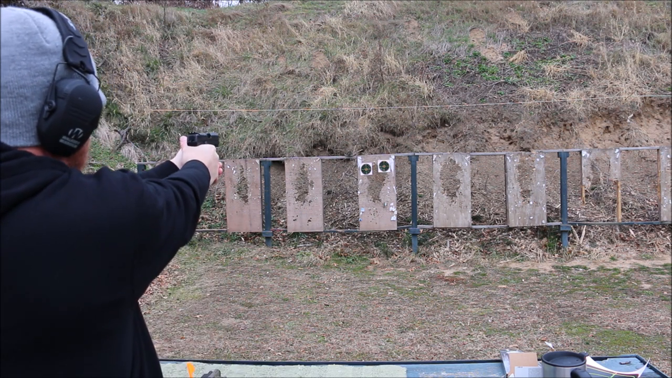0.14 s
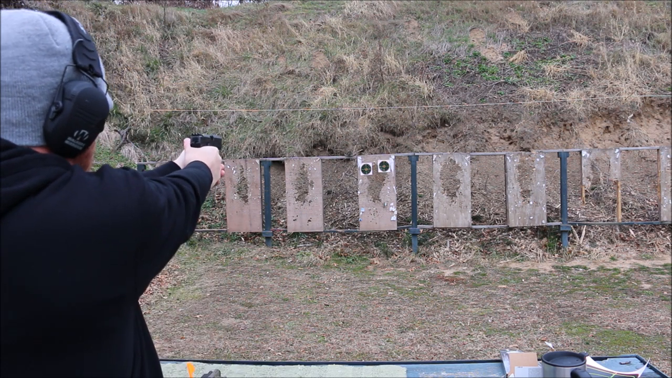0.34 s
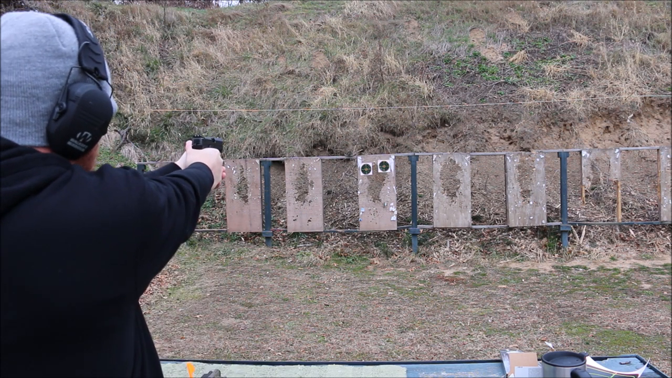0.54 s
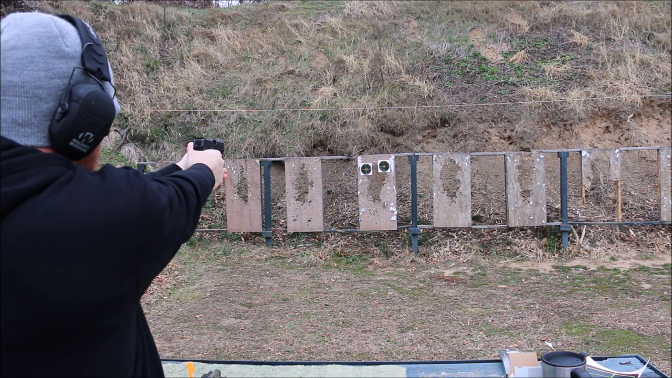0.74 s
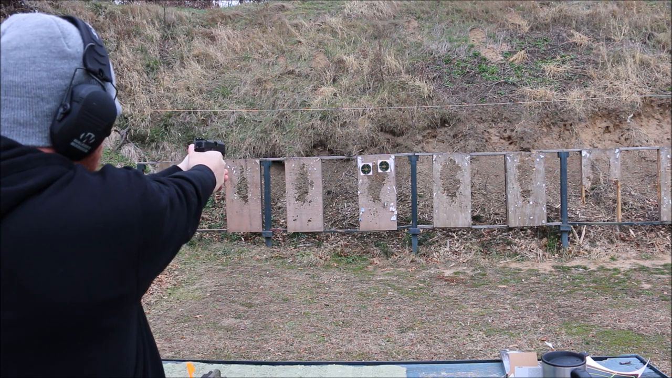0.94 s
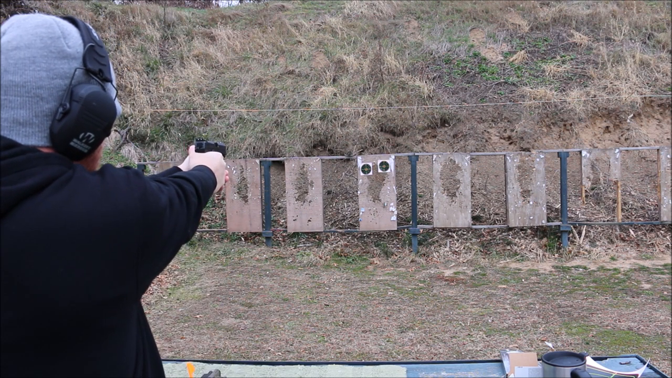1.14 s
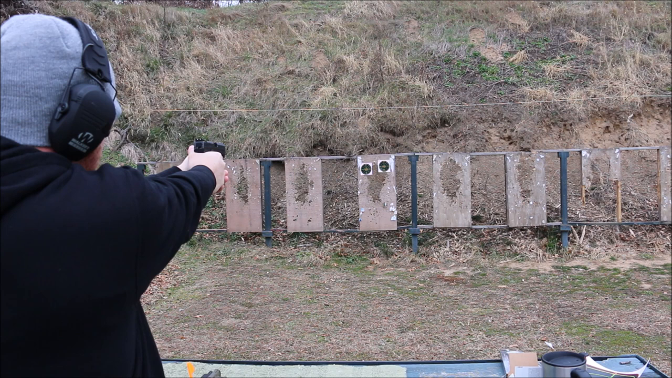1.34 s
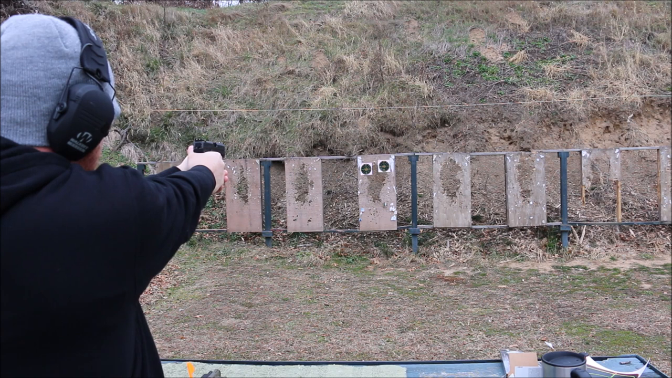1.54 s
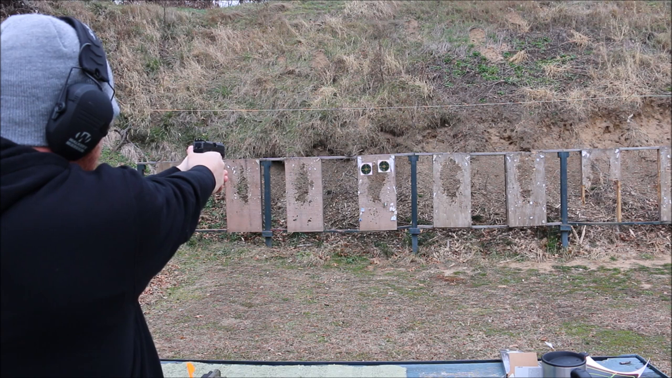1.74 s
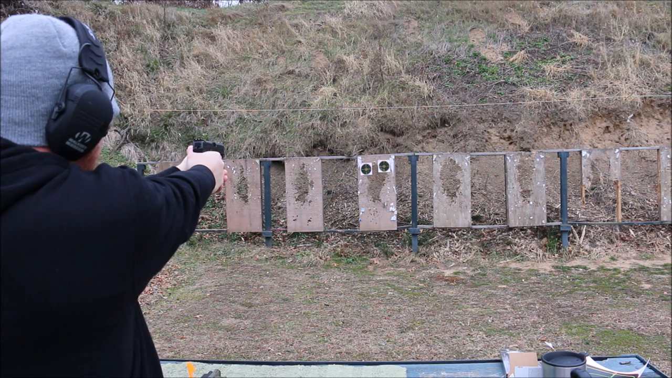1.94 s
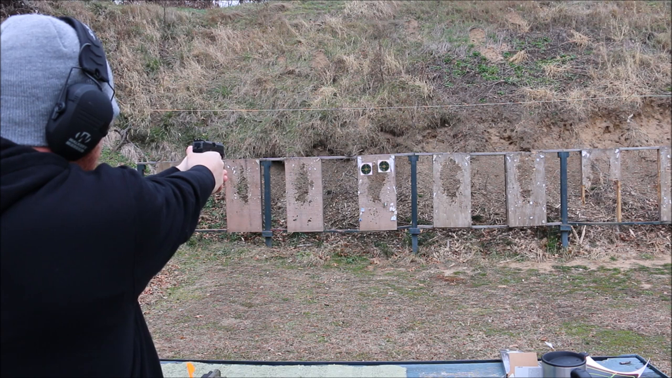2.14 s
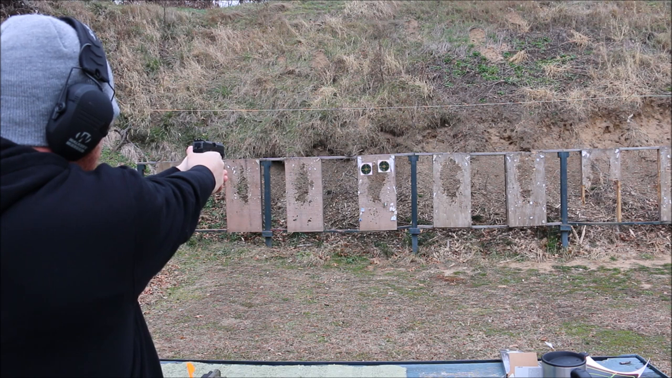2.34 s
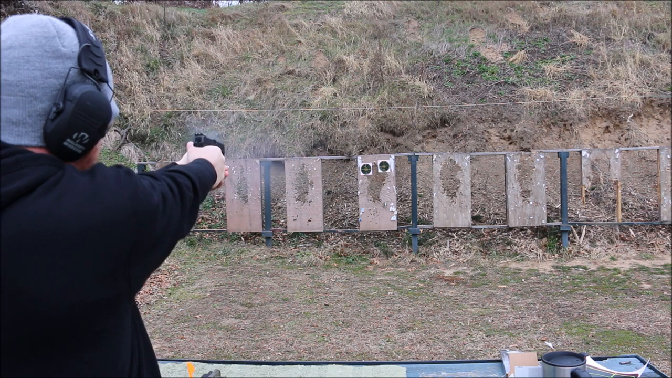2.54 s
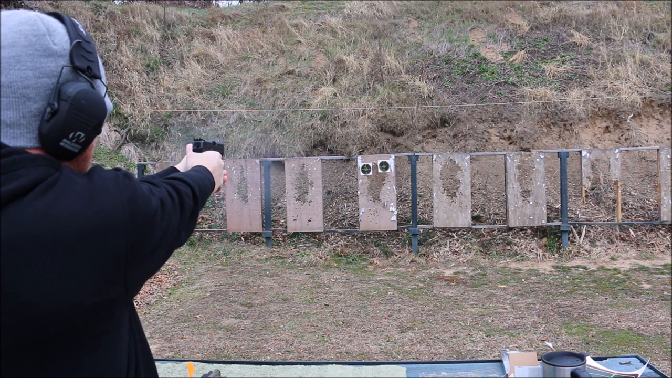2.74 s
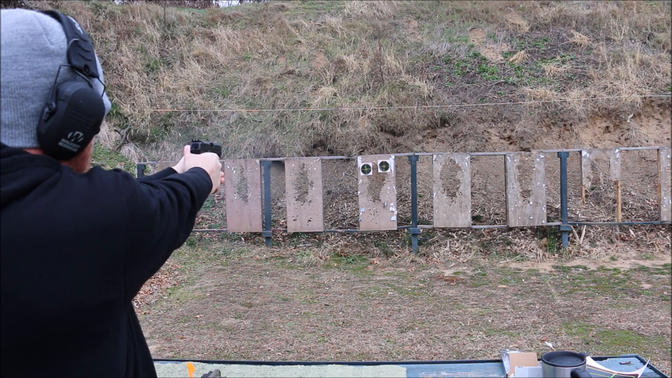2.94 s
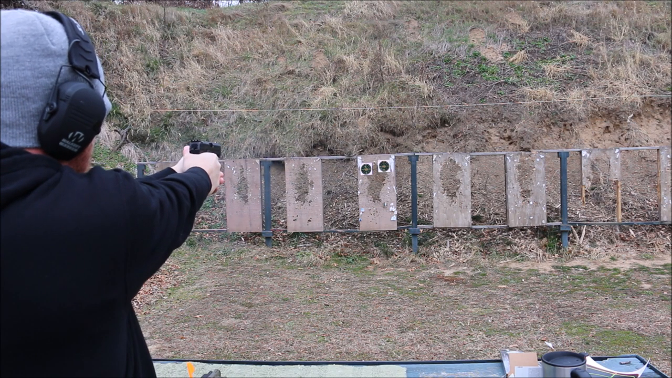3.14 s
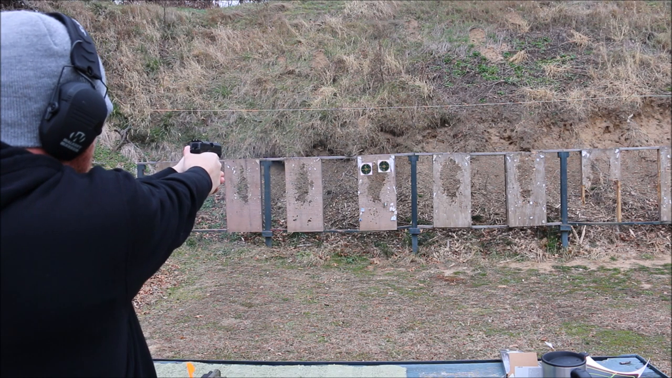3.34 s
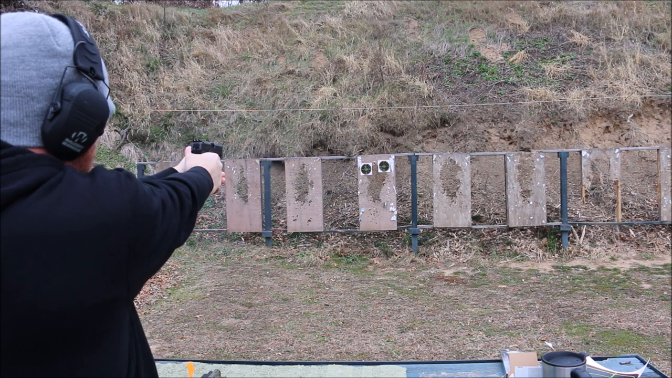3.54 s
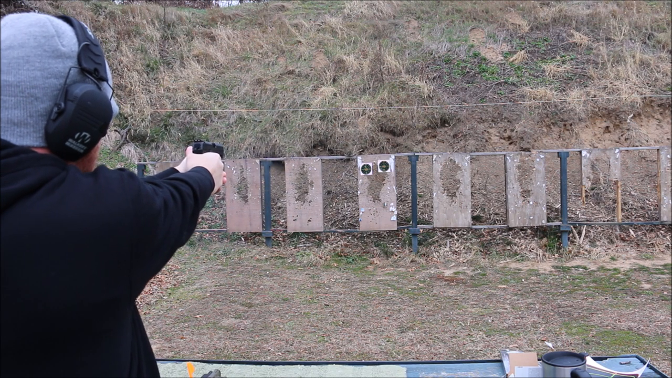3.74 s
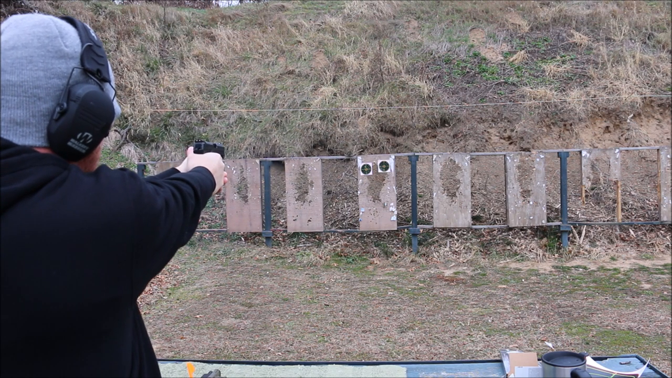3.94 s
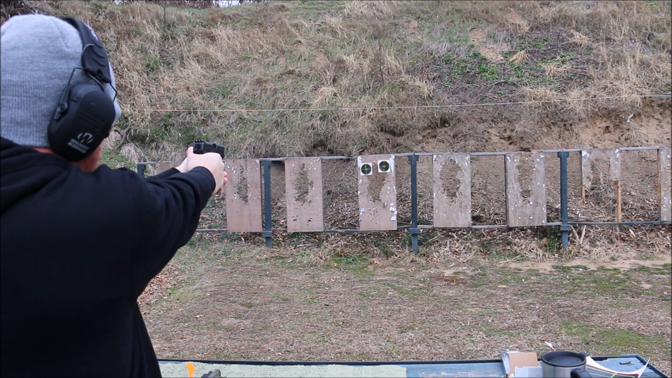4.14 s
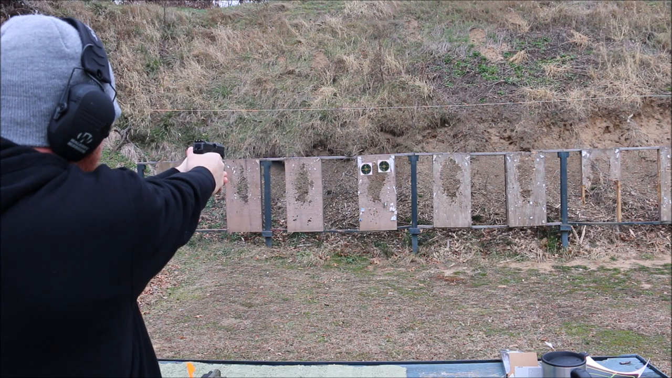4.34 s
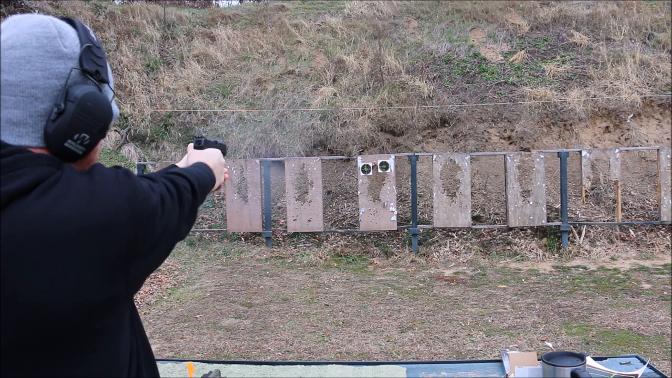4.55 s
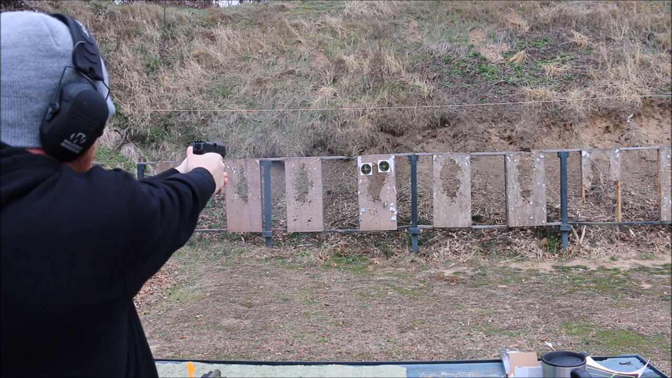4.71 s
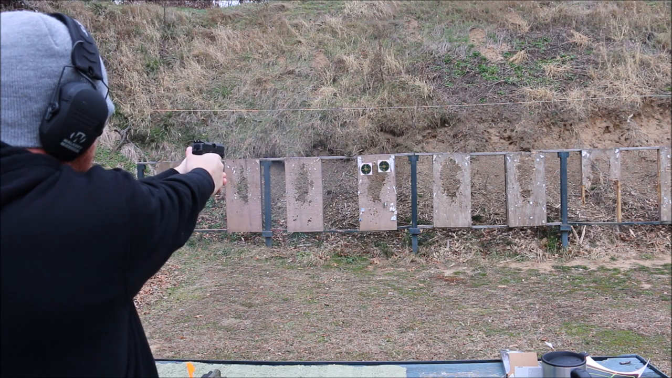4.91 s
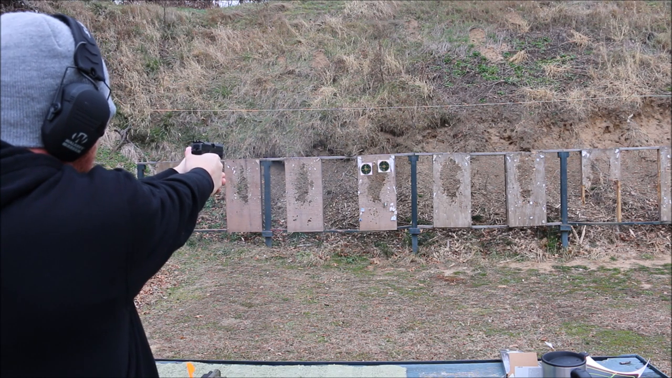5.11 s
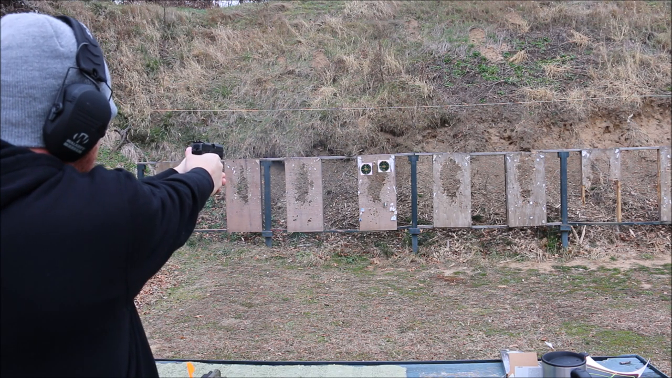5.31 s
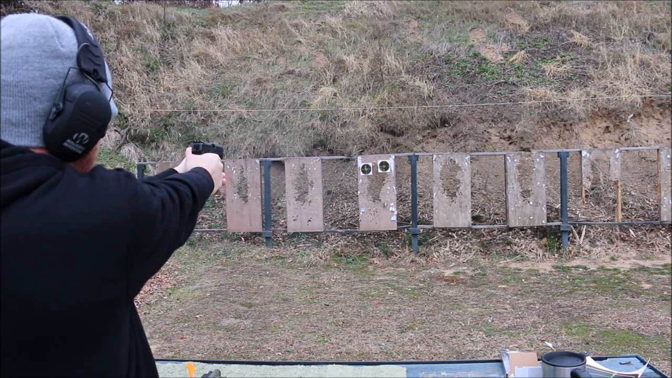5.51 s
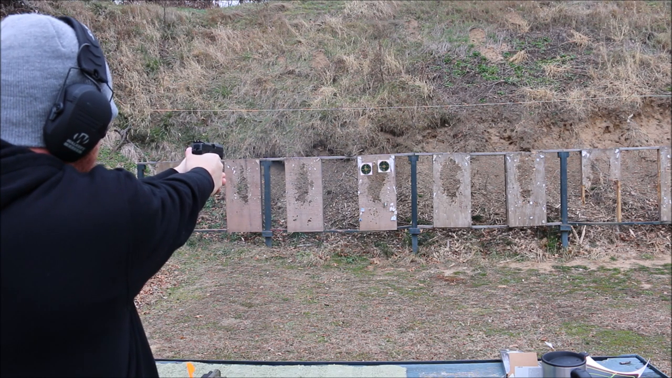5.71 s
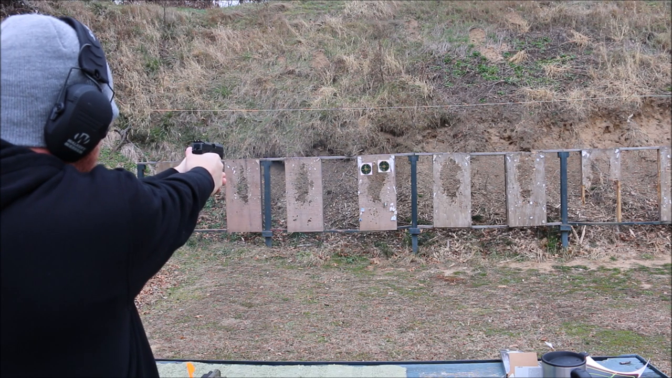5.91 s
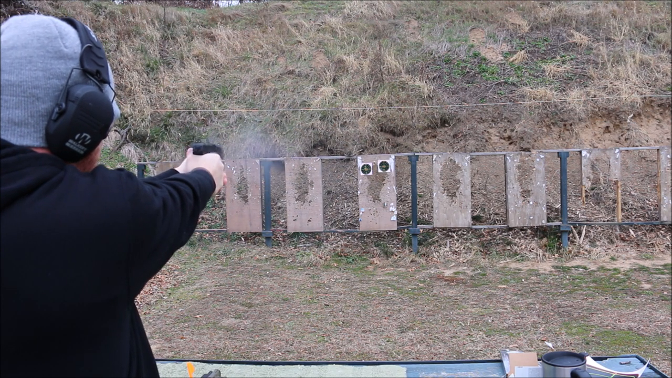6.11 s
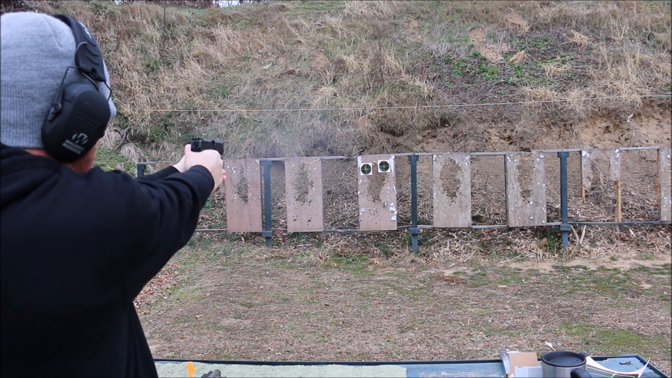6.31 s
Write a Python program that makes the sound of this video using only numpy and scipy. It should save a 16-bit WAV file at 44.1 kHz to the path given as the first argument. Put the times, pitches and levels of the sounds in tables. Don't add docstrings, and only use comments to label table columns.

```python
import sys
import numpy as np
from scipy import signal
from scipy.fft import rfft, irfft, next_fast_len
from scipy.io import wavfile
from scipy.ndimage import uniform_filter1d, map_coordinates

SR = 44100
rng = np.random.default_rng(int(sys.argv[2]) if len(sys.argv) > 2 else 0)


def waveform_to_disk(signal):
    frames = np.transpose(np.atleast_2d(signal))
    scaled = np.clip(frames, -1, 1) * 32767
    samples = np.round(scaled).astype(np.int16)
    wavfile.write(sys.argv[1], SR, samples)


def volts(x):
    e = np.asarray(x, float) / 20
    return 10 ** e


N = 280917


def unit(x):
    return x / np.sqrt(np.mean(x ** 2) + 1e-20)


def along(points, hz):
    f, value = np.transpose(points)
    return np.interp(np.log(hz + 1), np.log(f + 1), value)


def filtered(x, response):
    size = next_fast_len(x.shape[-1] + 8192)
    spectrum = rfft(x, size) * response(np.fft.rfftfreq(size, 1 / SR))
    return irfft(spectrum, size)[..., :x.shape[-1]]


def peak(f, hz, width):
    return 1j * f * width / (hz * hz - f * f + 1j * f * width)


def low_cut(f, hz):
    return 1j * f / (hz + 1j * f)


def fade(db, t, t60):
    return volts(db - 60 * t / t60)


def rise(t, attack):
    return 1 - np.exp(-t / attack)


def tone(pitch_hz):
    return np.sin(2 * np.pi * np.cumsum(pitch_hz) / SR)


def add(track, s, sound):
    part = track[round(s * SR):][:len(sound)]
    part += sound[:len(part)]


def burst(hz, width, db, t60, attack):
    t = np.arange(SR // 5) / SR
    noise = unit(filtered(rng.standard_normal(len(t)), lambda f: peak(f, hz, width) ** 2))
    return fade(db, t, t60) * rise(t, attack) * noise


# f/Hz, level/dB (per Hz)
AIR_COLOUR = [(12, -40.5), (25, -4), (100, -3), (200, -2.5), (320, -9), (750, -12), (2000, -21.5),
              (6000, -50)]
# t/s, level/dB
SLEEVE = [
    (.262, -61),
    (.3, -60),
    (.41, -65),
    (.455, -65),
]


def quiet():
    t = np.arange(N) / SR
    drift_db = 0.7 * map_coordinates(rng.standard_normal(60), [t * 8])
    air = unit(filtered(rng.standard_normal(N), lambda f: volts(along(AIR_COLOUR, f))))
    cloth = unit(filtered(rng.standard_normal(N), lambda f: peak(f, 2200, 1800) ** 2))
    half_length_s = 0.016
    strokes = sum(volts(db) * np.exp(-((t - s) / half_length_s) ** 2) for s, db in SLEEVE)
    return volts(-62.5 + drift_db) * air + strokes * cloth


# f/Hz, width/Hz, level/dB
WOOD_SPOTS = [
    [(1182, 570, 4), (2130, 120, 6.5), (2927, 390, 9.5), (3960, 820, -26), (9000, 13000, -28)],
    [(1410, 270, -6.5), (2712, 330, 0), (3700, 280, 4), (5210, 980, -2.5), (12500, 3500, -7.5)],
    [(1490, 900, -12), (2800, 460, 2.5), (4200, 320, 5.5), (6000, 1500, -1), (11200, 1500, -1)],
]


def wood_knock(db, rattle_db, spot):
    t = np.arange(4000) / SR
    push = np.exp(-((t - 0.0003) / 0.00007) ** 2)
    rim_edge = 0.23 * np.exp(-((t - 0.0003) / 0.00002) ** 2)
    rattle = fade(rattle_db - db, t, 0.044) * rng.standard_normal(len(t))
    blow = push + rim_edge + filtered(rattle, lambda f: 1 / (1 + 1j * f / 4500) ** 4)

    def bench(f):
        return sum((-1) ** k * volts(g) * peak(f, hz, width) for k, (hz, width, g) in enumerate(WOOD_SPOTS[spot]))

    wood = filtered(blow, bench)
    return volts(db) * wood / abs(wood).max()


def ground_snap(db, hz):
    t = np.arange(SR // 2) / SR
    snap = np.sin(2 * np.pi * hz * t) * np.exp(-1.6 * hz * t) * rise(t, 0.0001)
    return volts(db + 10.5) * filtered(snap, lambda f: low_cut(f, 150) / (1 + 1j * f / (1.34 * hz)) ** 3)


def ground_thud(db):
    t = np.arange(SR // 2) / SR
    return -fade(db, t, 0.013) * np.sin(2 * np.pi * 360 * t) * rise(t, 0.00068)


# f/Hz, level/dB, t60/s
CASE_RING = [(10885, -33, .27), (10930, -37, 0.38), (11050, -44, .15), (5225, -42.5, 0.26),
             (5400, -45.5, 0.3)]


def case_ring():
    t = np.arange(SR // 2) / SR
    spin = 1 + 0.7 * np.cos(2 * np.pi * 13 * (t - 0.012))
    return spin * sum(fade(db, t, t60) * np.sin(2 * np.pi * hz * t) for hz, db, t60 in CASE_RING)


# t/s, blow level/dB, rattle level/dB, spot number
BENCH_KNOCKS = [
    (3.027, 8, -9, 0),
    (3.8255, -29, -40, 2),
    (5.0667, -4.5, -29, 0),
    (5.0671, 6.5, -3, 1),
    (5.116, -22, -36, 2),
]
# t/s, snap level/dB, snap f/Hz, thud level/dB
GROUND_TAPS = [
    (3.6246, -25.5, 3130, -22.5),
    (3.627, -24.5, 1190, -30),
    (3.8044, -35, 2800, -66),
    (5.363, -30, 6000, -70),
    (5.755, -38, 4000, -69),
    (5.7987, -16.5, 1200, -23),
    (5.799, -12.5, 2920, -60.5),
    (5.8022, -22, 2580, -28.5),
    (5.8165, -42, 3500, -68),
    (6.026, -33.5, 2950, -71),
]
# t/s, snap level/dB
SETTLING = [
    (3.363, -45),
    (3.443, -48),
    (3.509, -47),
    (5.69, -46),
]


def brass():
    out = np.zeros(N)
    for s, db, rattle_db, spot in BENCH_KNOCKS:
        add(out, s, wood_knock(db, rattle_db, spot))
    for s, db, hz, thud_db in GROUND_TAPS:
        add(out, s, ground_snap(db, hz))
        add(out, s, ground_thud(thud_db))
    for s, db in SETTLING:
        add(out, s, ground_snap(db, hz=7000))
    add(out, BENCH_KNOCKS[3][0] + 0.00011, case_ring())
    return out


def trunks(count):
    size_db = 1.2 * unit(uniform_filter1d(rng.standard_normal(count), size=60))
    return unit(volts(size_db) * rng.standard_normal(count))


# delay t/s, level/dB
ROLL_FADE = [(0, -14.5), (0.056, -10.5), (0.111, -24.5), (.23, -21.5), (.43, -22.5), (0.579, -31.5),
             (1.1, -47.5), (1.55, -49.5), (2.1, -63)]
# f/Hz, level/dB (per Hz)
WOODS_COLOUR = [(100, -45), (300, -4.5), (950, 0), (1500, -8.5), (2400, -9), (4200, -18.5), (8000, -39),
                (15700, -66.5)]
# delay t/s, peak level/dB, f/Hz
BANKS = [(.0868, -8, 1007), (.0995, -7, 1141), (.1128, -11, 1050), (.1675, -13.5, 630), (.1965, -14.5, 637),
         (.2135, -14, 800), (.2675, -15, 690), (.2945, -12, 510), (.3455, -17.5, 980), (.3685, -12.5, 910),
         (.4105, -23.5, 746), (.4415, -12.5, 770), (.5625, -30.5, 960), (.7305, -31.5, 620),
         (.94, -37, 810), (1.0575, -44.5, 1030)]


def roll():
    s, db = np.transpose(ROLL_FADE)
    hz, t, grid = signal.stft(trunks(int(s[-1] * SR)), SR, nperseg=256)
    uneven = uniform_filter1d(rng.standard_normal(grid.shape), size=5, axis=0)
    uneven_db = 1.8 * unit(uniform_filter1d(uneven, size=4, axis=1))
    colour = volts(along(WOODS_COLOUR, hz))
    colour = colour / np.sqrt(np.mean(colour ** 2))

    nearest_s, tree_line_s = 0.16, 0.37
    lift_db = np.zeros(len(t))
    for at, bank_db, _ in BANKS:
        if at > nearest_s:
            trees_db = 0.3 + 0.47 * (bank_db - np.interp(at, s, db))
            lift_db += trees_db * np.exp(-((t - at) / (0.027 * at)) ** 2)
    solid = np.clip(1.2 - hz / 6000, 0.3, 1)[:, None]
    air_db_per_s = 2.5 + 1 * (hz[:, None] / 1000) ** 1.746
    air_db = air_db_per_s * (np.maximum(t, nearest_s) - tree_line_s)
    gain = volts(np.interp(t, s, db) + solid * lift_db - air_db + uneven_db)
    out = signal.istft(grid * colour[:, None] * gain, SR, nperseg=256)[1]
    return filtered(out, lambda f: low_cut(f, 130) ** 3)


def crack():
    t = np.arange(SR // 50) / SR
    pitch_hz = (2100 + 1500 * np.exp(-t / 0.0008)) * rng.uniform(0.93, 0.94)
    cycles = fade(-0.5, t, 0.018) * rise(t, 0.00028) * tone(pitch_hz)
    return cycles + burst(hz=4500, width=9000, db=-11.5, t60=0.014, attack=0.00027)[:len(t)]


def blast():
    t = np.arange(SR // 5) / SR
    sweep = fade(15, t, 0.044) * tone(560 + 4200 * np.exp(-t / 0.0018))
    swing = -fade(9.5, t, 0.028) * np.sin(2 * np.pi * 70 * t)
    boom = burst(hz=183, width=70, db=-1.5, t60=0.09, attack=0.0039)
    body = burst(hz=671, width=560, db=20.5, t60=0.044, attack=0.0016)
    gap = fade(11, t, 0.057) * rise(t, 0.0016) * np.sin(2 * np.pi * 440 * t)
    return sweep + swing + boom + gap + body


# delay t/s, level/dB, dulling f/Hz, t60/s
WALLS = [
    (0.0454, -9, 10950, .3),
    (0.0866, -22.5, 3830, 0.043),
    (0.091, -24.5, 2480, 0.049),
]


def hollow():
    out, direct = roll(), blast()
    t = np.arange(SR // 5) / SR
    add(out, 0, direct)
    for delay, db, hz, t60 in WALLS:
        spit = burst(hz=2400, width=4000, db=20, t60=0.015, attack=0.000083)
        copy = filtered(direct + spit, lambda f: low_cut(f, delay * 1500) / (1 + 1j * f / hz))
        add(out, delay, fade(db, t, t60) * copy)
    slopes = np.zeros(len(out))
    for delay, db, hz in BANKS:
        u = t / 0.0014
        add(slopes, delay, volts(db + 12.5) * u * np.exp(-u) * np.sin(2 * np.pi * hz * t))
    add(out, 0.7, burst(hz=253, width=62, db=-37.5, t60=0.43, attack=0.019))
    return out + filtered(slopes, lambda f: low_cut(f, 250) ** 2)


# t/s, level/dB
PISTOL_SHOTS = [
    (2.4456, 2),
    (4.4755, 2.5),
    (6.144, 2.5),
]


def pistol():
    out, answer = np.zeros(N), hollow()
    for s, db in PISTOL_SHOTS:
        add(out, s - 0.0052, burst(hz=3500, width=2700, db=-28, t60=0.028, attack=0.002))
        add(out, s - 0.0026, crack())
        add(out, s, volts(db) * answer)
        add(out, s, burst(hz=3330, width=4000, db=22, t60=0.013, attack=0.00025))
        add(out, s + 0.27, volts(-8.5) * roll()[SR // 5:])
    return out


def scene():
    mid = quiet() + brass() + pistol()
    return np.array([mid, mid])


def roll_off(x):
    return signal.sosfilt(signal.butter(12, 17160, fs=SR, output="sos"), x)


# f/Hz, level/dB (per Hz)
HISS_COLOUR = [(20, 0.5), (200, -3), (690, -6), (1500, -5.5), (14600, -8), (15750, -8), (15900, -59.5)]


def record(dry):
    t = np.arange(N) / SR
    hiss = unit(filtered(rng.standard_normal((2, N)), lambda f: volts(along(HISS_COLOUR, f))))
    wet = dry + volts(-59.5) * hiss
    fine = signal.resample_poly(wet, 4, 1, axis=1)
    clipped = signal.resample_poly(fine / (1 + abs(fine) ** 12) ** (1 / 12), 1, 4, axis=1)

    lead_s = 0.0011
    ducks = [(s - lead_s, 11) for s, _ in PISTOL_SHOTS]  # (start s, depth dB)
    ducks += [(s + lead_s, 3.5) for s, db, *_ in BENCH_KNOCKS if db > 0]
    duck_db = np.zeros(N)
    for s, depth_db in ducks:
        since = np.maximum(t - s, 0)
        release = np.exp(-np.maximum(since - 0.12, 0) / 0.27)
        duck_db = np.maximum(duck_db, depth_db * rise(since, 0.0079) * release)
    band = filtered(clipped, lambda f: low_cut(f, 25) / (1 + (f / 16000) ** 60))
    return roll_off(volts(-4 - duck_db) * band)


dry = scene()
out = record(dry)
waveform_to_disk(out)
```